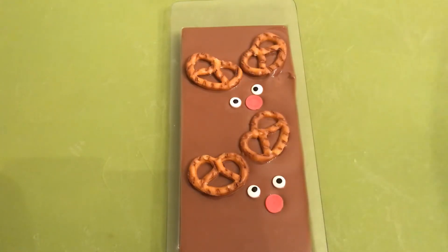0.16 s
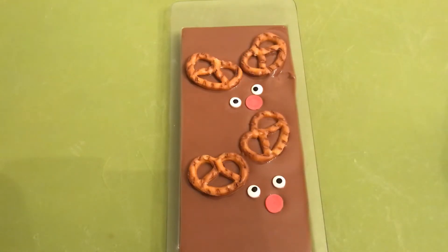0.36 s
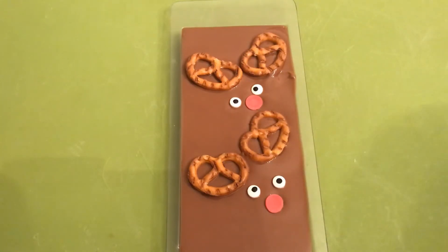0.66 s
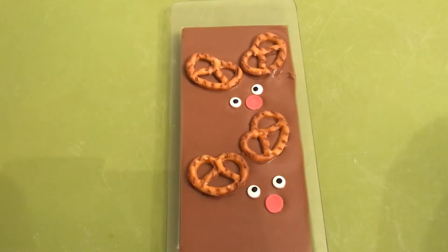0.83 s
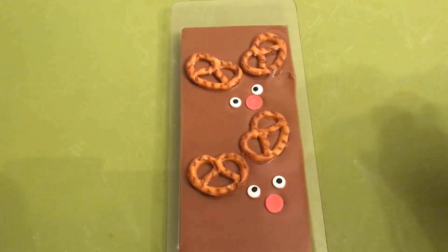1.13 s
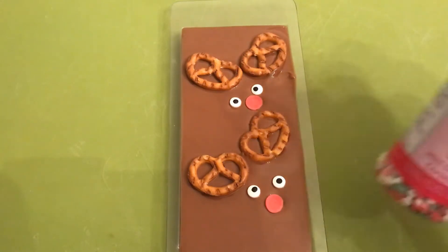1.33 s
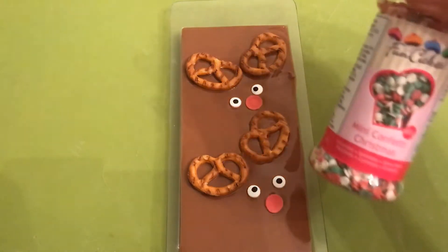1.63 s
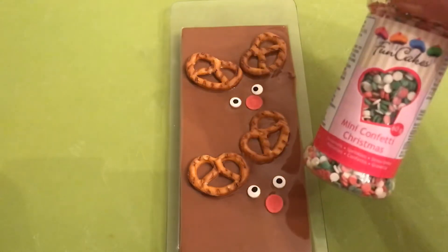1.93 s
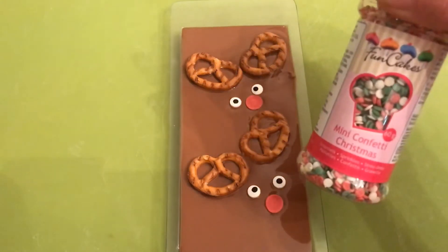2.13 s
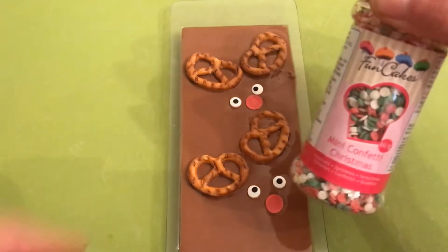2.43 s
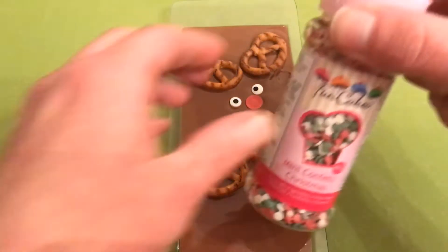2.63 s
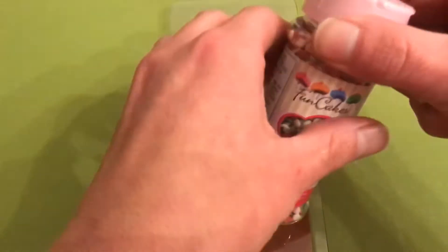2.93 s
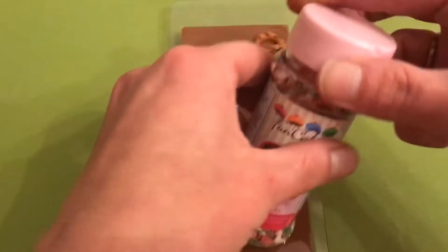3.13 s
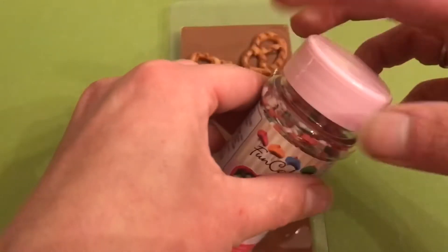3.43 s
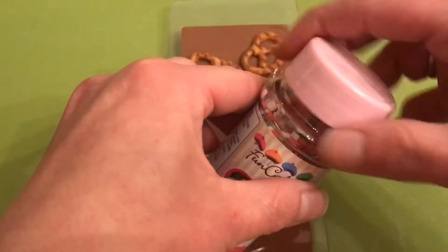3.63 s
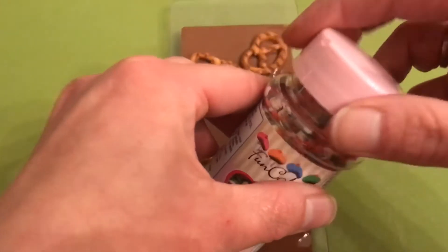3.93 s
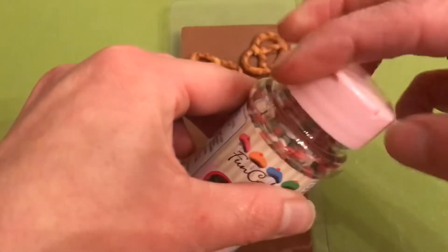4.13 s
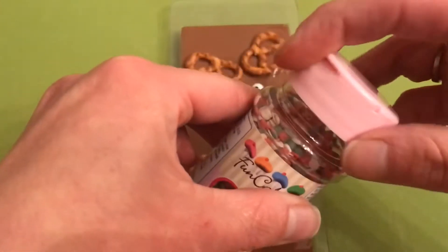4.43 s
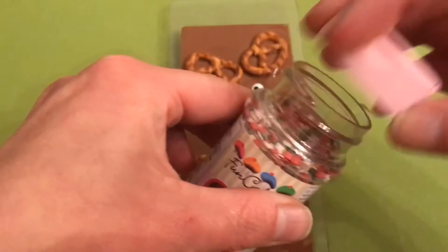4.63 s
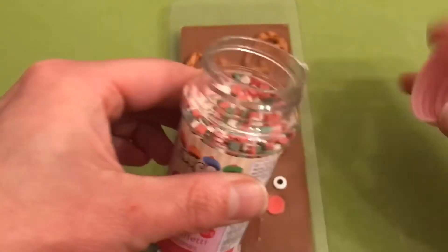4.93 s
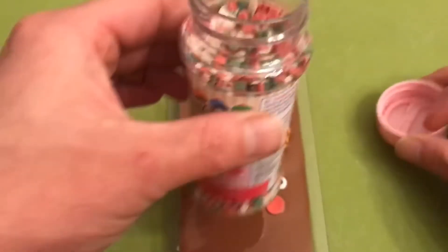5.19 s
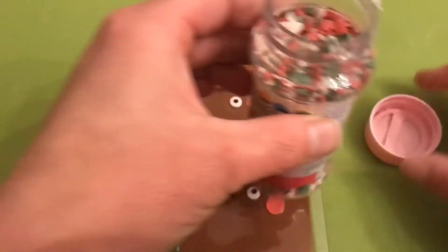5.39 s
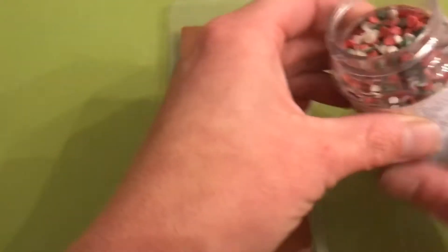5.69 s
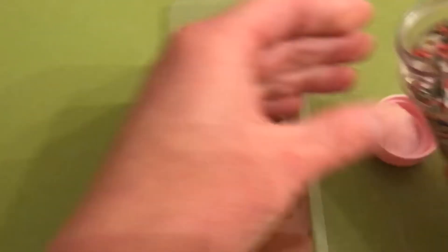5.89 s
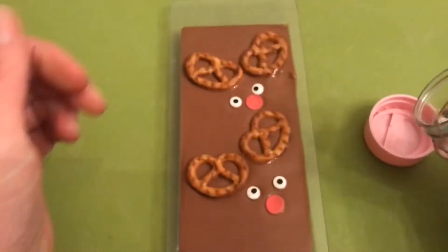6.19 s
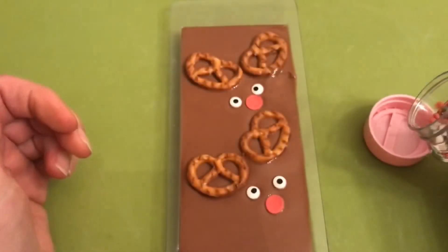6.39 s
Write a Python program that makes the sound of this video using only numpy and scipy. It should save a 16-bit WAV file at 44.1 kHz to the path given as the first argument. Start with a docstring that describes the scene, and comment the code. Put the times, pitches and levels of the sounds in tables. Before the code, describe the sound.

A quiet room with a low rumble and slight hiss lies under close handling sounds. From about 0.3 to 1.2 seconds, a small plastic jar is picked off a wooden table with a few ringing knocks and clacks. Sugar sprinkles shift faintly inside until about 1.9 seconds. Soft, dull taps come from across the room around 1.5 and 2.8 seconds, and a sleeve brushes faintly near 2.6. From 3.1 to 4.7 seconds, the screw lid is twisted off in short turns, with plastic rubbing, scraping and snapping unevenly along the thread. Damp fingertips peel away with tiny dry clicks around 4.8. At about 5.3 seconds, the lid clatters briefly onto a mat. Then the jar is tipped, and the sprinkles slide in small surges, ticking brightly against its wall, loudest from 5.8 to 6.3 seconds and thinning out by 6.5.

```python
"""Opening a jar of sprinkles

A small plastic jar is picked off a wooden table with a few knocks. Its screw lid is twisted off in short
turns, rubbing and snapping along the thread. Damp fingertips peel off the plastic, the lid is put down
on a mat, and the jar is tipped so that sugar sprinkles slide and tick against its wall. Each hit makes
the wood or plastic ring at its own tones. A sleeve and far taps are heard faintly in the quiet room."""
import sys
import numpy as np
from scipy import signal
from scipy.fft import rfft, irfft
from scipy.io import wavfile

SR = 44100
rng = np.random.default_rng(int(sys.argv[2]) if len(sys.argv) > 2 else 0)


def generate_wav(sig):
    """Save sig (samples, or channels by samples) to the path in sys.argv[1] as 16-bit PCM at SR."""
    pcm = np.round(np.clip(np.atleast_2d(sig).T, -1, 1) * 32767).astype(np.int16)
    wavfile.write(sys.argv[1], SR, pcm)


N = 288855

# single sprinkles hitting the jar wall: (time [s], level [dB], bass [dB], treble [dB])
SPRINKLE_TICKS = [(1.144, -40, -12, 9.5), (1.357, -52.5, 18.5, -5.5), (1.7805, -44, 1, -4),
                  (1.8712, -42, 10, -14), (1.8979, -34, -21, 5), (5.1547, -33, -11, -5),
                  (5.417, -28, -34.5, -3), (5.6595, -34.5, -17, 17), (5.792, -36, -11, -14),
                  (5.8002, -28, -17, 1), (5.8061, -18, -35, 7), (5.832, -30, -12, 1), (5.8529, -17, -22, 0),
                  (5.9305, -24.5, -7, -8), (5.9571, -20.5, -29, 13), (5.9654, -16.5, -7.5, 4),
                  (5.9807, -20, -18, 9), (5.9907, -36, -20, 7), (6.0015, -23, -28, 12),
                  (6.0458, -25, -7, -3), (6.1, -21, -10, 16), (6.1403, -21.5, -13, 6),
                  (6.2075, -26.5, -7, 13), (6.2216, -20.5, 2, 17), (6.2389, -21, 6.5, 9),
                  (6.2742, -20.5, 4, 18), (6.28, -25, 8, 1), (6.2941, -19.5, -1, 8), (6.3148, -26, -7, 19),
                  (6.3881, -28.5, -4.5, 5), (6.4459, -30.5, 0, 20), (6.517, -37, 1, 0),
                  (6.5409, -36, -5, 23)]
# the heap of sprinkles sliding in surges: (start [s], length [s], level [dB])
SLIDES = [(0.312, 0.027, -54), (0.357, .08, -69.5), (0.441, 0.038, -58), (0.489, 0.037, -61),
          (0.863, .03, -50.5), (0.899, 0.047, -55.5), (0.965, 0.053, -69.5), (1.082, 0.034, -65),
          (1.126, 0.033, -53.5), (1.167, 0.09, -62.5), (1.391, 0.031, -66.5), (1.893, 0.042, -61.5),
          (4.487, 0.051, -67), (4.772, 0.092, -60), (4.9, .12, -71), (5.034, 0.15, -62.5), (5.25, .03, -62),
          (5.35, 0.08, -54.5), (5.445, 0.1, -66), (5.595, 0.12, -64), (5.722, 0.071, -59),
          (5.789, 0.047, -49.5), (5.836, 0.069, -55), (5.928, .085, -54.5), (6.025, 0.062, -61),
          (6.092, 0.11, -54.5), (6.202, 0.05, -50), (6.263, .055, -50), (6.322, 0.059, -58.5),
          (6.386, 0.16, -65), (5.884, .03, -68)]
# tones of the jar wall under the sprinkles: (pitch [Hz], level [dB], ring time [s])
WALL_TONES = [(2470, -13, 0.0046), (3205, -14, 0.0067), (3740, -17, 0.0077), (4480, -9, 0.0044),
              (5400, -6.5, 0.0032), (6000, -8, 0.0052), (7020, -7, 0.003), (8580, -8.5, 0.0041),
              (9700, -5.5, 0.0026), (11200, -4.5, 0.0031), (12100, -15, 0.0027), (13200, 2, 0.0019),
              (14300, -22, 0.0032), (14900, -7.5, 0.0045)]
# the jar clacks as it is lifted, then the lid snaps: (time [s], level [dB], bass [dB], treble [dB])
JAR_SNAPS = [(0.4494, -24, -15, -37), (0.8659, -22.5, -19, -8.5), (1.1657, -21.5, -17, -19),
             (1.1736, -28.5, -20, -28), (3.1108, -45, -14, 7), (3.1755, -38, 12, 5),
             (3.2042, -40.5, -18, -4), (3.2197, -33, -40, -15), (3.2891, -26, -8.5, -11),
             (3.2935, -29, 3, -28), (3.3345, -26.5, -24, -1.5), (3.4495, -30, -3.5, -4),
             (3.4554, -25.5, -37, -4), (3.4742, -22, -5.5, 4), (3.4827, -33, -25, -17),
             (3.5324, -39.5, 3, -24), (3.591, -41.5, 1, -33), (3.6369, -35, -9, -22),
             (3.6503, -29.5, 3, -7), (3.664, -37.5, -13, -18), (3.6781, -32.5, -14, -15),
             (3.7216, -29.5, 1.5, -14), (3.7645, -26, -7, 0), (3.8006, -35.5, 11, -9),
             (3.8167, -29.5, -3, 2.5), (3.8289, -29, -2.5, -19), (3.8429, -21.5, -33, -13),
             (3.8622, -37.5, -23, 0), (3.896, -45, -5, 0), (3.9146, -41.5, 5, -17), (3.9487, -35.5, 0, -27),
             (4.0098, -39, 4.5, -42), (4.1197, -34, -13, -16), (4.1626, -36, 3, 1),
             (4.1768, -23.5, -4.5, -4.5), (4.2465, -25.5, -2.5, -29), (4.3873, -22.5, -6.5, -6),
             (4.4265, -33, -8, -46), (4.5993, -31.5, -10.5, -8), (4.6117, -48, -23, 16),
             (4.6457, -50.5, -20, 23.5)]
# tones of the plastic jar: (pitch [Hz], level [dB], ring time [s])
JAR_TONES = [(324, 3, 0.017), (400, -3, 0.019), (1015, 3.5, 0.0027), (1610, 1, 0.0058),
             (2300, -2.5, 0.0036), (3014, 0.5, 0.0048), (3910, 0, 0.0038), (5330, 0.5, 0.0029),
             (6550, -1.5, 0.005), (9060, -1.5, 0.0015), (12300, -1.5, 0.001), (14000, -8.5, 0.001),
             (14600, -0.5, 0.001)]
# the lid rubbing round the neck: (start [s], length [s], low tones' level [dB], high tones' level [dB])
LID_TURNS = [(3.095, 0.41, -70, -66), (3.64, 0.29, -63, -65), (3.969, .3, -65, -70),
             (4.294, 0.44, -74.5, -72.5)]
# plastic scraping on plastic: (start [s], length [s], level [dB], bass [dB], treble [dB])
JAR_SCRAPES = [(1.041, 0.095, -62, -9, -17), (3.128, 0.02, -65.5, -23, 2), (3.166, 0.013, -53.5, 1, -6),
               (3.328, 0.096, -62.5, 4, 0), (3.44, 0.019, -48, -6.5, -11), (3.46, 0.023, -49, 1, -17.5),
               (3.634, 0.061, -54, -3, -4.5), (3.704, 0.031, -54.5, 0.5, -3.5),
               (3.764, 0.018, -56.5, 1, -6), (3.806, 0.043, -48, 4, -9), (3.903, 0.038, -54.5, -1, 1.5),
               (3.942, 0.012, -54, -4, -10), (4.008, 0.013, -60.5, 10, -38), (4.102, 0.03, -52, -23, -1.5),
               (4.137, 0.028, -54, -8, -3), (4.24, .04, -57.5, -2, -10), (4.536, .035, -56.5, -45, -8),
               (4.58, 0.041, -50.5, -15.5, -22), (4.652, 0.025, -59, -35, -3.5),
               (1.187, 0.12, -63.5, 1.5, -20), (3.2, 0.13, -66, -17, -4), (3.971, 0.16, -67, -9, -2.5),
               (4.422, 0.07, -65, -4, -23), (5.231, 0.074, -54.5, 1.5, -7.5)]
# the lid landing on the mat: (time [s], level [dB], bass [dB], treble [dB])
LID_HITS = [(5.2377, -53, 4.5, -8), (5.2671, -48.5, 9, 14), (5.2763, -42, 9, -12), (5.288, -23.5, -16, -27),
            (5.339, -34, -3, -28), (5.3477, -38, -2, -31), (5.3552, -40.5, 1, -8), (5.364, -32.5, -2, -25),
            (5.3718, -22, -22, 1.5), (5.3924, -44.5, 1, -18)]
# tones of the loose lid: (pitch [Hz], level [dB], ring time [s])
LID_TONES = [(215, 3.5, 0.022), (373, -11, 0.019), (940, -4.5, 0.03), (1103, -3, 0.052), (1157, -2, 0.032),
             (1420, 2, 0.0078), (1644, 2.5, 0.0099), (2020, -11, 0.011), (2320, -9.5, 0.014),
             (3000, -11, 0.0092), (3980, -15, 0.004), (5660, -10, 0.0051), (6800, 1, 0.0018),
             (12800, -6, 0.0021)]
# knocks on the table top: (time [s], level [dB], bass [dB], treble [dB])
TABLE_KNOCKS = [(0.316, -22.5, -3.5, -1.5), (0.333, -48, -17, 6), (0.448, -36.5, -7, 6),
                (0.504, -49, 9.5, 17.5), (0.522, -52, 2, 19), (0.856, -40, -2, 4), (0.905, -50, 15, 14),
                (0.915, -55, 2, 18), (0.92, -26, -48, -5.5), (1.201, -44, -9, -6.5), (1.246, -57, 4, -17)]
# tones of the wooden table: (pitch [Hz], level [dB], ring time [s])
TABLE_TONES = [(57, -8.5, 0.22), (117, -5.5, .18), (140.2, -4.5, 0.17), (180.5, -4.5, 0.11),
               (220.7, -5.5, 0.22), (275, -7.5, 0.18), (344, -7, 0.093), (435, -4, 0.067), (602, 0, 0.053),
               (706, -3.5, 0.059), (808, -4.5, 0.017), (1000, -5, 0.015), (1375, -10.5, 0.017),
               (1900, -9.5, 0.0073), (2860, -8.5, 0.011), (3240, -8, 0.0054), (4500, -9.5, 0.0031),
               (6430, -7.5, 0.0026), (9040, -7.5, 0.0025), (13000, -27, 0.0024)]
# rubs that sing on one tone: (start [s], length [s], pitch [Hz], level [dB])
SINGING_RUBS = [(1.099, 0.13, 274, -58.5), (5.042, 0.015, 2980, -65), (5.067, 0.041, 3080, -62),
                (5.149, 0.006, 3120, -57), (5.828, 0.051, 3050, -62)]
# fingertips letting go: (start [s], length [s], level [dB])
FINGER_PEELS = [(4.692, .004, -44), (4.761, 0.005, -36), (4.778, .035, -37), (4.834, 0.045, -41)]
# the hiss of cloth, from low to high: (pitch [Hz], level [dB])
CLOTH_COLOUR = [(290, -35), (500, -12), (1480, -1.5), (1840, -2.5), (2930, -2), (7640, -10.5), (14200, -10),
                (16000, -13.5)]
# taps further off in the room: (time [s], level [dB])
DISTANT_TAPS = [(1.487, -43.5), (1.645, -47.5), (2.847, -40)]
# the dull sound of those taps: (pitch [Hz], level [dB])
TAP_COLOUR = [(150, -33), (250, -4), (476, -3), (1240, -18.5), (1580, -11), (1920, -27.5), (2230, -6.5),
              (2480, -25), (2920, -20), (4790, -29.5), (9000, -36), (11700, -52), (19800, -120)]
# room and microphone noise: (pitch [Hz], level [dB])
BACKGROUND_COLOUR = [(15, -48), (25, 6), (53, -2.5), (129, -6), (260, -6.5), (509, -20.5), (762, -17.5),
                     (1200, -19.5), (1950, -24.5), (4150, -29.5), (4870, -30), (8580, -33), (10400, -35.5),
                     (11800, -32.5), (15500, -32.5)]
# how the room's rumble rises and falls: (time [s], level [dB])
RUMBLE_CURVE = [(0.0, -62), (0.33, -61), (0.44, -56), (0.97, -59), (1.95, -62.5), (3.04, -62.5),
                (3.85, -62.5), (3.94, -64.5), (4.61, -64.5), (5.14, -61.5), (5.44, -59.5), (5.95, -60),
                (6.55, -57)]
# bands of treble weakened by the microphone's housing: (pitch [Hz], width [Hz], change [dB])
HOUSING_DIPS = [(5060, 180, -5.5), (8300, 270, -1.5), (10620, 730, -1)]

# faint extra hits: (level over the scrape or slide [dB], spread [dB], bass [dB], treble [dB])
STRAY_SNAPS = (16.5, 9, -21, -1)
STRAY_TICKS = (21.5, 5.5, -17, 2)


def sprinkles():
    """Hard sugar grains tick on the jar wall, with fainter ticks at random while the heap slides."""
    hits = SPRINKLE_TICKS + strays(SLIDES, STRAY_TICKS, count=90)
    ticks = struck(hits, WALL_TONES, centre_hz=9100, gain_db=-8.5,
                   chatter_s=0.003, rough=0.077, spread_db=2)
    return high_pass(ticks + sliding_heap(), 2190)


def sliding_heap():
    """Many small grains tumble; each tone of the wall gets its own share of their hits."""
    level = sum(from_db(db) * stroke(start, length) for start, length, db in SLIDES)
    tumble = tiny_hits(2000, size_db=3.4, clumps_db=3.6)
    wall = sum(from_db(db) * ring(tumble * rng.standard_normal(N), hz, ring_s)
               for hz, db, ring_s in WALL_TONES)
    return level * unit_level(wall)


def jar():
    """The plastic jar rings as it is picked up and as its lid snaps, rubs and scrapes along the thread."""
    hits = JAR_SNAPS + strays(JAR_SCRAPES, STRAY_SNAPS, count=30)
    snaps = struck(hits, JAR_TONES, centre_hz=2350, gain_db=-8.5,
                   chatter_s=0.0016, rough=0.15, spread_db=3.5)
    return high_pass(snaps + twisting() + scraping(), 164)


def twisting():
    """Plastic slipping on plastic shakes the jar; the high tones carry the fine squeak of the thread."""
    low = sum(from_db(db) * ring(tiny_hits(1500, 7.5, 6), hz, ring_s) for hz, db, ring_s in JAR_TONES[:9])
    high = sum(from_db(db) * ring(tiny_hits(1200, 5.9, 1.5), hz, ring_s)
               for hz, db, ring_s in JAR_TONES[9:])
    turns = np.array([stroke(*turn[:2]) for turn in LID_TURNS])
    low_level, high_level = from_db(np.transpose(LID_TURNS)[2:]) @ turns
    return from_db(1.3 * drift(15)) * (low_level * unit_level(low) + high_level * unit_level(high))


def scraping():
    """Each scrape is a crowd of uneven little slips that shake all the jar's tones together."""
    slips, out = tiny_hits(2500, size_db=2, clumps_db=4), np.zeros(N)
    strokes = np.array([stroke(*scrape[:2]) for scrape in JAR_SCRAPES])
    level_db, bass_db, treble_db = np.transpose(JAR_SCRAPES)[2:]
    for hz, tone_db, ring_s in JAR_TONES:
        pressure = from_db(level_db + tone_db - 6 + tilt_db(hz, 1930, bass_db, treble_db)) @ strokes
        out += pressure * unit_level(ring(slips * rng.standard_normal(N), hz, ring_s))
    return out


def lid_landing():
    """The loose lid clatters onto the mat and rings briefly at each touch."""
    return struck(LID_HITS, LID_TONES, centre_hz=1350, gain_db=-6,
                  chatter_s=0.0015, rough=0.14, spread_db=1)


def table_knocks():
    """Knocks make the wooden top ring, its low tones lasting longest."""
    return struck(TABLE_KNOCKS, TABLE_TONES, centre_hz=1400, gain_db=-5.5,
                  chatter_s=0.0046, rough=0.14, spread_db=3)


def singing_rubs(ring_cycles=45):
    """Tiny hits keep one tone going: low for the jar dragging, high for a grain rolling on the rim."""
    hits = tiny_hits(1500, size_db=7.2, clumps_db=5.9)
    return sum(from_db(db) * stroke(start, length) * unit_level(ring(hits, hz, ring_cycles / hz))
               for start, length, hz, db in SINGING_RUBS)


def peeling_fingers(clicks_per_s=170, spread_db=1.5):
    """Damp skin lets go of the plastic in runs of dry, unevenly spaced clicks."""
    gap_s = 1 / clicks_per_s
    clicks = [(time + rng.random() * gap_s / 2, db + spread_db * rng.standard_normal())
              for start, length, db in FINGER_PEELS for time in np.arange(start, start + length, gap_s)]
    return high_pass(bursts(clicks, rng.standard_normal(N), decay_s=0.0014), 1600)


def sleeve(full_at_s=2.56, hold_s=0.16, hold_db=-66, swell_db_per_s=84, fade_db_per_s=150):
    """Cloth brushes over the mat with a hiss that swells, holds and fades."""
    since_full = np.arange(N) / SR - full_at_s
    ramp_db = np.minimum(swell_db_per_s * since_full, fade_db_per_s * (hold_s - since_full))
    level_db = hold_db + np.minimum(0, ramp_db)
    return from_db(level_db + 1.2 * drift(10)) * coloured_noise(CLOTH_COLOUR)


def distant_taps():
    """Taps across the room, each a short puff of dull noise."""
    return bursts(DISTANT_TAPS, coloured_noise(TAP_COLOUR), decay_s=0.03)


def room_echo(sound, ring_s=0.36, dull_above_hz=3100):
    """Sound bounces between the walls along eight paths, getting weaker and duller on every round."""
    out, dull = np.zeros(N), np.exp(-2 * np.pi * dull_above_hz / SR)
    for path, lag in enumerate((rng.uniform(.008, .03, 8) * SR).astype(int)):
        loop, state = sound.copy(), [0.]
        gain = from_db(-60 * lag / SR / ring_s)
        for i in range(lag, N, lag):
            bounce, state = signal.lfilter([gain * (1 - dull)], [1, -dull], loop[i - lag:i], zi=state)
            loop[i:i + lag] += bounce[:N - i]
        out += (loop - sound) * (-1) ** path
    for lag in (59, 149):  # two short delays smear the echoes into a wash
        taps = np.zeros(lag + 1)
        taps[[0, lag]] = 1, -.65
        out = signal.lfilter(taps[::-1], taps, out)
    return out


def background(hiss_db=-66):
    """The room's low rumble wanders in level, with microphone hiss above it."""
    noise = coloured_noise(BACKGROUND_COLOUR)
    low = signal.sosfilt(signal.butter(2, 450, fs=SR, output="sos"), noise)
    curve_db = np.interp(np.arange(N) / SR, *np.transpose(RUMBLE_CURVE))
    rumble = from_db(curve_db - 0.5 + drift(2)) * unit_level(low)
    hiss = from_db(hiss_db + 0.077 * drift(0.2)) * unit_level(noise - low)
    return rumble + hiss


def struck(hits, tones, centre_hz, gain_db, chatter_s, rough, spread_db, contact_s=0.0003):
    """Each hit is a click plus a short rough chatter, and both set the object's tones ringing."""
    times, level_db, bass_db, treble_db = np.transpose(hits)
    out, luck = np.zeros(N), rng.standard_normal((len(times), 3 * len(tones)))
    for k, (hz, tone_db, ring_s) in enumerate(tones):
        strength, direction, lateness = luck[:, 3 * k:3 * k + 3].T
        at = np.round((times + contact_s * abs(lateness)) * SR).astype(int)  # tones start a little apart
        hit_db = level_db + gain_db + tone_db + tilt_db(hz, centre_hz, bass_db, treble_db)
        clicks = np.zeros(N)
        clicks[at] = from_db(hit_db + spread_db * strength)
        chatter = rough * die_away(clicks, chatter_s) * rng.standard_normal(N)
        clicks[at] *= np.sign(direction)  # the spot struck decides which way a tone first swings
        out += ring(clicks + min(1, hz / centre_hz) * chatter, hz, ring_s)  # low tones get less chatter
    return out


def strays(strokes, settings, count):
    """Hits at random moments inside the strokes, more of them and stronger where a stroke is loud."""
    over_db, spread_db, bass_db, treble_db = settings
    level = sum(from_db(row[2]) * stroke(*row[:2]) for row in strokes) + 1e-9
    running_total, luck = np.cumsum(level), rng.standard_normal((count, 3))
    at = np.searchsorted(running_total, running_total[-SR // 50] * rng.random(count))
    hit_db = 20 * np.log10(level[at]) + over_db - spread_db * abs(luck[:, 0])
    return list(zip(at / SR, hit_db, bass_db + 5 * luck[:, 1], treble_db + 6 * luck[:, 2]))


def tiny_hits(per_s, size_db, clumps_db):
    """Tiny pushes at random moments, mostly faint, arriving in clumps."""
    sizes = from_db(size_db * np.minimum(rng.exponential(1, N), 4)) * rng.choice([-1, 1], N)
    chance = per_s * from_db(clumps_db * drift(40)) / SR
    return unit_level(sizes * (rng.random(N) < chance))


def ring(force, hz, ring_s):
    """Each push starts a pure tone that fades by 60 dB over its ring time (2 ms at the least)."""
    decay = from_db(-60 / (max(ring_s, .002) * SR))
    angle = 2 * np.pi * min(hz, .45 * SR) / SR
    return signal.lfilter([0, np.sin(angle)], [1, -2 * decay * np.cos(angle), decay ** 2], force + 1e-18)


def bursts(events, noise, decay_s):
    """Noise that starts at each event and dies away."""
    clicks = np.zeros(N)
    clicks[[round(time * SR) for time, db in events]] = from_db(np.array(events)[:, 1] - 7.5)
    return die_away(clicks, decay_s) * noise


def die_away(clicks, decay_s):
    """Gives each click a smoothly fading tail."""
    return signal.lfilter([1], [1, -np.exp(-1 / (decay_s * SR))], clicks + 1e-18)


def stroke(start, length):
    """The loudness of one movement: it rises in 3 ms and tails off as things settle."""
    end = start + max(length, .006)
    return np.interp(np.arange(N) / SR, [start, start + .003, end, end + .005, end + .03], [0, 1, .7, .2, 0])


def tilt_db(hz, centre_hz, bass_db, treble_db):
    """Bass and treble controls that act fully two octaves from the centre."""
    octaves = np.clip(np.log2(hz / centre_hz), -2, 2)
    return abs(octaves) / 2 * (treble_db if octaves > 0 else bass_db)


def drift(rate_hz):
    """A smooth random wobble of about 1 either way; a higher rate makes it quicker."""
    step, settle = 40, 2000  # one value every 40 samples; the first 2000 values are skipped
    memory = np.exp(-2 * np.pi * rate_hz * step / SR)
    noise = rng.standard_normal(N // step + settle + 2)
    slow = signal.lfilter([1], [1, -2 * memory, memory ** 2], noise)[settle:]
    return np.interp(np.arange(N) / step, np.arange(len(slow)), unit_level(slow))


def coloured_noise(colour):
    """Noise made stronger or weaker at each pitch, following a table."""
    table_hz, table_db = np.transpose(colour)
    hz = np.fft.rfftfreq(N, 1 / SR) + 1
    gain = from_db(np.interp(np.log(hz), np.log(table_hz), table_db))
    return unit_level(irfft(rfft(rng.standard_normal(N)) * gain, N))


def high_pass(sound, hz):
    """Turns down everything below the given pitch."""
    return signal.sosfilt(signal.butter(4, hz, "high", fs=SR, output="sos"), sound)


def unit_level(sound):
    """Scales a sound so that its average power is 1."""
    return sound / np.sqrt(np.mean(sound ** 2) + 1e-20)


def from_db(db):
    """Turns decibels into a number to multiply by."""
    return 10 ** (np.asarray(db) / 20)


def scene(echo_db=-25, table_send_db=5):
    """The near sounds and their room echo, with distant taps and background noise."""
    table = table_knocks()
    near = table + jar() + lid_landing() + sprinkles() + singing_rubs() + peeling_fingers() + sleeve()
    echo = room_echo(near + from_db(table_send_db) * table)  # the wide table top feeds the room most
    return (near + from_db(echo_db) * echo + distant_taps() + background())[None]


def record(dry, low_cut_hz=44, high_cut_hz=16050):
    """The microphone's housing dips the treble; the deepest bass and the very top are cut away."""
    for hz, width, db in HOUSING_DIPS:
        band = signal.lfilter(*signal.iirpeak(hz, hz / width, fs=SR), dry)
        dry = dry + (from_db(db) - 1) * band
    dry = high_pass(dry, low_cut_hz)
    return signal.sosfilt(signal.cheby2(16, 45, high_cut_hz, fs=SR, output="sos"), dry)


dry = scene()
out = record(dry)
generate_wav(out)
```